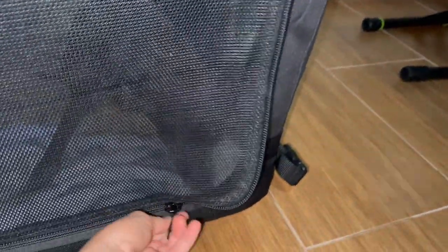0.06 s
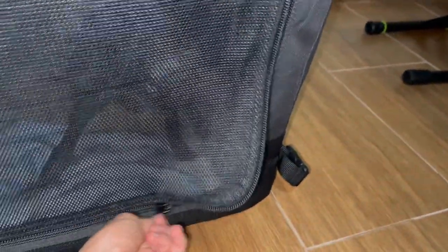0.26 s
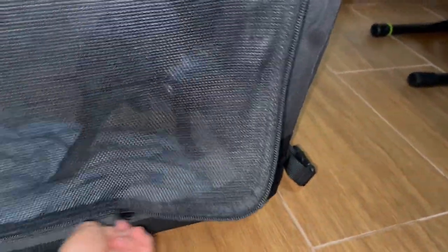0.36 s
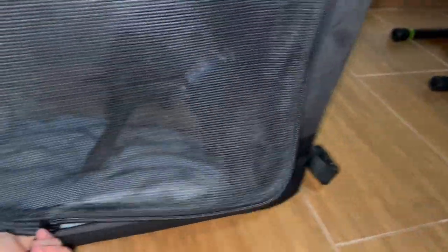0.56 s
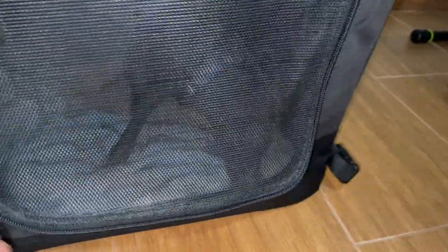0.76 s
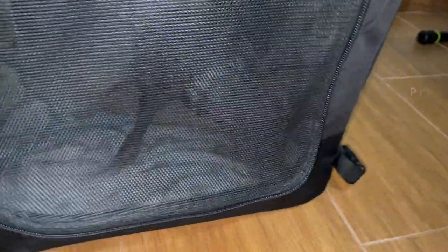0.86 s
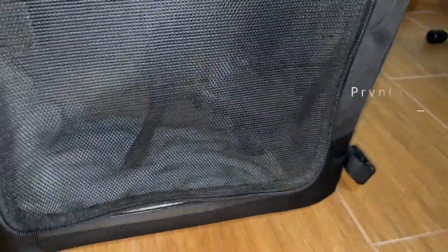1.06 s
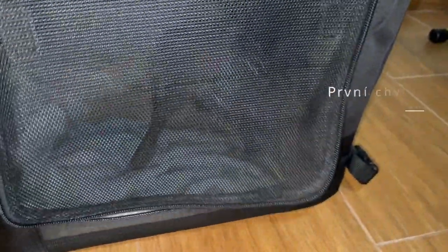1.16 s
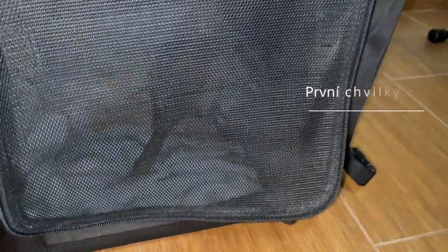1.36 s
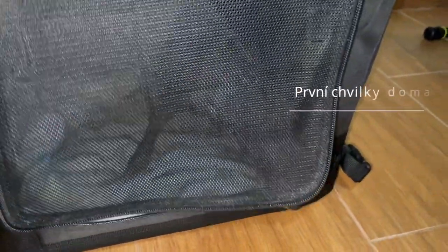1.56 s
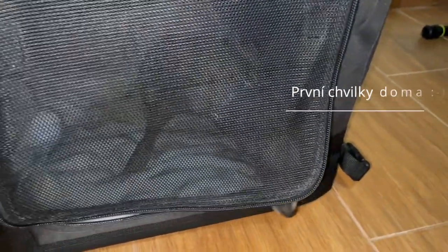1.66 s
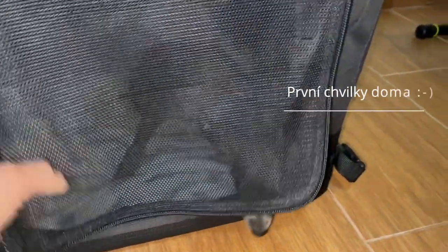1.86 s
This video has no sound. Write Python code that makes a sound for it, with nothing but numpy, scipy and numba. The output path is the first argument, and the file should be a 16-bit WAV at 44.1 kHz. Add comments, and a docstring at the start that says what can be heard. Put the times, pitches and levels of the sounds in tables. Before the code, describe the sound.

A zipper pulled open in two quick strokes, then a light metal clink.

```python
"""The mesh door of a soft pet crate is unzipped, close by, in a small room with a low hum.
First the pull ticks as fingers take hold of it. From 0.23 s to 1.27 s the zip opens in two strokes:
each tooth snaps in the slider and tugs the fabric panel, faster when the hand moves faster,
while the tape (the cloth strip that holds the teeth) scrapes along.
Then the loose door rustles, and at about 1.5 s the metal pull tab clinks."""
import sys
import numpy as np
from scipy import signal
from scipy.fft import rfft, irfft
from scipy.io import wavfile
from scipy.ndimage import uniform_filter1d, map_coordinates
from numba import njit

SR = 44100
rng = np.random.default_rng(int(sys.argv[2]) if len(sys.argv) > 2 else 0)


def put_to_file(sound):
    """Save the sound as 16-bit audio at rate SR, in the file named by the first command-line argument."""
    columns = np.atleast_2d(sound).T  # one column per channel
    safe = np.clip(columns, -1, 1)
    whole_steps = np.round(safe * 32767)
    wavfile.write(sys.argv[1], SR, whole_steps.astype(np.int16))


N = 83790
T = np.arange(N) / SR

# how fast the hand moves the slider: time_s, teeth_per_s
SLIDER_SPEED = [(.2345, 118), (.26, 177), (.29, 203), (.32, 227), (.355, 215), (.40, 229), (.435, 244),
                (.485, 222), (.505, 199), (.57, 199), (.598, 213), (.635, 150), (.675, 76), (.705, 122),
                (.74, 330), (.765, 175), (.785, 145), (.83, 172), (.86, 226), (.905, 282), (.935, 337),
                (.96, 333), (.985, 309), (1.02, 316), (1.054, 302), (1.066, 256), (1.115, 250), (1.14, 241),
                (1.21, 251), (1.24, 208), (1.27, 125)]
# tone colour (strong and weak pitches) of the tape's rasp: pitch_hz, level_db
RASP_COLOUR = [(700, -18.5), (1200, 0.5), (1700, -3.5), (2100, -5), (2500, 0), (3500, 0), (4500, -6.5),
               (6000, -2), (8000, 2.5), (13000, -32.5)]
# level of the room's echo against the direct sound
SNAP_ROOM_DB, RASP_ROOM_DB, PANEL_ROOM_DB = -11, -2, -6.5


def gain(db):
    """Turn decibels into a factor to multiply by."""
    return 10 ** (np.asarray(db) / 20)


def curve(table):
    """Join rows of (time_s, value) with straight lines."""
    return np.interp(T, *np.array(table, float).T)


def by_frequency(table, size):
    """Spread rows of (pitch_hz, value) over the spectrum of `size` samples."""
    hz, value = np.array(table, float).T
    spectrum_hz = np.arange(size // 2 + 1) * SR / size
    return np.interp(np.log(spectrum_hz + 1), np.log(hz), value)


def unit(x):
    """Scale a signal to an average power of 1."""
    return x / np.sqrt(np.mean(x ** 2) + 1e-20)


def noise():
    """An even hiss (white noise)."""
    return rng.standard_normal(N)


def impulses(times, sizes, reach=8):
    """Sharp clicks at exact times, even between two samples."""
    out = np.zeros(N)
    at = np.asarray(times)[:, None] * SR
    index = at.astype(int) + np.arange(1 - reach, reach + 1)
    clicks = np.asarray(sizes)[:, None] * np.sinc(index - at) * np.sinc((index - at) / reach)
    np.add.at(out, np.clip(index, 0, N - 1), clicks)
    return out


def tint(x, colour, size=4096):
    """Give a sound a tone colour; white noise keeps its power."""
    cepstrum = irfft(by_frequency(colour, size) * np.log(10) / 20)
    # make the filter ring after a click, never before it
    cepstrum[1:size // 2] *= 2
    cepstrum[size // 2 + 1:] = 0
    response = irfft(np.exp(rfft(cepstrum)))
    return signal.fftconvolve(x, response / np.linalg.norm(response))[:N]


@njit
def resonate(x, pitch_hz, width_hz):
    """Let through a band of sound around a pitch that may move."""
    out, band_state, low_state = np.empty(len(x)), 0., 0.
    for i in range(len(x)):
        step, damping = np.tan(np.pi * pitch_hz[i] / SR), width_hz / pitch_hz[i]
        band = (band_state + step * (x[i] + 1e-18 - low_state)) / (1 + step * (step + damping))
        band_state = 2 * band - band_state
        low_state += 2 * step * band
        out[i] = damping * band
    return out


def place(x, room_db, fade_60db_s=0.15, gap_s=0.00281):
    """Sound reaches the left and right microphone directly, then as a short room echo."""
    # how much louder the left side is: pitch_hz, level_db
    balance = [(60, .3), (200, 1), (380, 2.5), (700, 6.5), (1300, 5), (2400, 2.5), (5500, 4), (8100, .5),
               (15000, 0)]
    # how far the left side's wave is ahead: pitch_hz, phase_radians
    left_lead = [(60, 0), (450, .65), (800, .7), (1100, 1.9), (1500, 1.5), (2300, 0), (3200, .6),
                 (5000, .6), (7000, .1), (8650, 0), (10200, -3.14), (11900, -6.28), (13300, -8)]
    size, t = 2 * N, T[:N // 2]
    tail = rng.standard_normal((2, len(t))) * gain(-60 * t / fade_60db_s) * (t > gap_s)
    tail /= np.linalg.norm(tail, axis=1, keepdims=True)
    tilt = gain(by_frequency(balance, size) / 2)
    sides = np.array([tilt * np.exp(1j * by_frequency(left_lead, size)), 1 / tilt])
    room = rfft(tail, size)
    alike = by_frequency([(60, 1.0), (600, 0.26)], size)  # both sides share the deepest echo
    room[1] = alike * room[0] + np.sqrt(np.clip(1 - alike ** 2, 0, 1)) * room[1]
    return irfft(rfft(x, size) * sides * (1 + gain(room_db) * room))[:, :N]


def room_tone(rumble_db=-54.5, hum_hz=49, hum_db=-55.5):
    """The room rumbles and hums, low and steady."""
    # colour of the rumble: pitch_hz, level_db
    rumble_colour = [(22, -68), (36, -32), (48, -4.5), (60, -3), (80, -4.5), (105, -17), (145, -3.5),
                     (200, -17.5), (400, -21.5), (1000, -31), (4000, -48.5), (11000, -53), (13500, -72)]
    rumble = gain(rumble_db) * tint(noise(), rumble_colour)
    hum = gain(hum_db) * np.sin(2 * np.pi * hum_hz * T)
    return place(rumble, room_db=-12.5) + hum


def door_fabric(grain_db=1.5):
    """The door rustles and flaps softly; most flaps fall in pitch as the cloth slackens."""
    # loudness of the rustle: time_s, level_db
    rustle_level = [(0, -58.5), (.16, -69.5), (.19, -60), (.24, -42), (1.27, -46), (1.33, -57), (1.42, -64),
                    (1.49, -77), (1.512, -47), (1.55, -58.5), (1.6, -44.5), (1.64, -50.5), (1.68, -59),
                    (1.73, -72.5), (1.785, -64), (1.9, -65)]
    # colour of the rustle: pitch_hz, level_db
    rustle_colour = [(60, -4.5), (160, 9), (300, 16), (500, 12), (1000, 8), (2800, 4), (4000, 2.5),
                     (8500, 1.5), (11400, 8.5), (13000, -20), (16000, -61)]
    # soft flaps: time_s, pitch_hz, level_db, width_s, pitch_fall_per_s
    flap_events = [(.622, 560, -30, .006, 9), (.744, 320, -22.5, .008, 14), (1.263, 350, -32, .005, 12),
                   (1.278, 175, -29, .006, 12), (1.338, 178, -47, .022, 0), (1.635, 305, -44, .015, 6),
                   (.04, 145, -52, .03, 0)]
    flicker = unit(uniform_filter1d(noise(), size=90))
    grain = unit(gain(grain_db * flicker))
    rustle = tint(grain * noise(), rustle_colour) * gain(curve(rustle_level))
    flaps = 0
    for at, hz, db, width_s, fall in flap_events:
        pitch = hz * np.exp(-fall * np.clip(T - at, -2 * width_s, 2 * width_s))
        swell = np.exp(-.5 * ((T - at) / width_s) ** 2)
        flaps += gain(db) * swell * np.sin(2 * np.pi * (np.cumsum(pitch) / SR + rng.random()))
    return place(rustle, PANEL_ROOM_DB) + place(flaps, room_db=-13)


def finger_ticks(span_s=0.0023):
    """The pull and slider tick as the fingers take hold and let go."""
    # ticks, with levels averaged over span_s: start_s, low_db, middle_db, treble_db, decay_s
    ticks = [(0.059, -78, -73, -36.5, 0.00046), (0.115, -55, -50, -44.5, 0.0013),
             (0.1796, -49, -49.5, -49, .0006), (0.2028, -32, -38, -29, .0011),
             (.208, -44, -43, -42, 0.00072), (.2205, -35.5, -33.5, -33.5, 0.00057),
             (1.442, -53, -49.5, -62.5, 0.00037), (1.512, -55, -43.5, -40, 0.003),
             (1.534, -58, -69, -49, .002), (1.5609, -43.5, -39, -32, 0.0018),
             (1.746, -53, -51, -56, 0.00088)]
    # colour of the panel's knock under a tick: pitch_hz, level_db
    knock_colour = [(100, -4), (250, -3), (450, -3), (700, -2), (1000, 5.5), (1400, -8.5), (4000, -57)]
    # colour of a tick's treble: pitch_hz, level_db
    treble_colour = [(3000, -27), (5500, -7), (7000, -14.5), (8800, 2), (10200, 6), (11400, 8),
                     (12500, -12), (14000, -11), (16000, -23)]
    bands = (knock_colour, PANEL_ROOM_DB), (RASP_COLOUR, RASP_ROOM_DB), (treble_colour, SNAP_ROOM_DB)
    out = 0
    for band, (colour, room_db) in enumerate(bands):
        layer = np.zeros(N)
        for at, *levels_db, decay_s in ticks:
            grit = noise() * np.exp(-np.abs(T - at) / decay_s) * (T >= at)
            layer += gain(levels_db[band]) * unit(tint(grit, colour)) * np.sqrt(span_s * SR / N)
        out += place(layer, room_db)
    return out


def fading_tone(pitch_hz, fade_60db_s):
    """One tone of a struck object, dying away."""
    return np.sin(2 * np.pi * pitch_hz * T) * gain(-60 * T / fade_60db_s)


def pull_tab():
    """The metal tab swings against the slider and rings; its plastic pull clicks."""
    # tones of the metal tab: pitch_hz, level_db, fade_60db_s
    tab_tones = [(2150, -7, .03), (2500, -7, .035), (4283, 0, .065), (4325, -4, .05), (4452, -5, .04),
                 (8200, 1, .022), (10340, -1, .045)]
    # hits on the slider: start_s, level_db
    clinks = [(1.508, -50), (1.515, -39), (1.559, -53)]
    # hollow plastic clicks: start_s, pitch_hz, level_db
    plastic_clicks = [(.114, 1780, -43.5), (0.181, 2850, -41.5), (1.441, 2350, -36)]
    times, hit_db = np.array(clinks).T
    ringing = sum(gain(db) * fading_tone(hz, fade_s) for hz, db, fade_s in tab_tones)
    out = signal.fftconvolve(impulses(times, gain(hit_db)), ringing)[:N]
    for at, hz, db in plastic_clicks:
        click = fading_tone(hz, fade_60db_s=0.0098)
        out += signal.fftconvolve(impulses([at], [gain(db)]), click)[:N]
    return place(out, SNAP_ROOM_DB)


def mesh_panel(tugs):
    """The tugged panel buzzes in three bands that change as the slider moves along it."""
    # loudness of each band: time_s, level_db
    low_level = [(.23, -45), (.314, -39.5), (.47, -53), (.53, -44), (.62, -37), (.68, -42.5), (.744, -36.5),
                 (.786, -44), (.896, -43.5), (0.931, -35), (1.02, -39.5), (1.05, -46), (1.078, -44.5),
                 (1.27, -47)]
    middle_level = [(.23, -40), (.29, -34), (.34, -33), (.375, -37), (0.396, -26.5), (.46, -37.5),
                    (.53, -33.5), (.595, -34.5), (.62, -33), (.67, -32.5), (0.724, -29.5), (.76, -40),
                    (.82, -36), (.89, -39), (.95, -37.5), (1, -56.5), (1.046, -36), (1.07, -42.5),
                    (1.196, -35), (1.24, -44.5), (1.269, -30.5)]
    high_level = [(.23, -48), (.3, -34.5), (.36, -42), (.4, -33.5), (.5, -37.5), (.55, -44.5), (.63, -35),
                  (.68, -46), (.8, -37), (.912, -31), (.945, -45.5), (0.987, -25), (1.043, -25.5),
                  (1.075, -35.5), (1.15, -33), (1.2, -39.5), (1.27, -35)]
    # colour of each band: pitch_hz, level_db
    low_colour = [(50, -37), (130, -13.5), (205, -7.5), (330, -6.5), (400, -10), (600, -46)]
    middle_colour = [(220, -28.5), (340, -14.5), (450, 4), (620, 1.5), (720, 0.5), (1000, -27)]
    high_colour = [(500, -40), (660, -15.5), (740, 0.5), (930, 1), (1150, 3.5), (1400, -13.5),
                   (2600, -26.5)]
    # where the upper two bands ring: time_s, pitch_hz
    middle_pitch = [(.23, 390), (.28, 547), (.325, 640), (.355, 450), (.46, 447), (.52, 600), (.615, 590),
                    (.65, 403), (.72, 530), (.76, 420), (.81, 475), (.86, 566), (.95, 690), (1.05, 593),
                    (1.085, 523), (1.22, 520), (1.265, 384)]
    high_pitch = [(.23, 840), (.3, 795), (.34, 1039), (.41, 970), (.46, 1020), (.58, 990), (.66, 880),
                  (.9, 876), (.97, 890), (1.05, 944), (1.075, 770), (1.17, 690), (1.25, 1060)]
    middle = resonate(tugs, curve(middle_pitch), width_hz=131.) + gain(-30) * tugs
    high = resonate(tugs, curve(high_pitch), width_hz=130.) + gain(-15) * tugs
    buzz = tint(tugs, low_colour) * gain(curve(low_level))
    buzz += tint(middle, middle_colour) * gain(curve(middle_level))
    buzz += tint(high, high_colour) * gain(curve(high_level))
    return place(buzz, PANEL_ROOM_DB)


def tape_rasp(force, swell_s=0.056):
    """The tape rasps, with ringing bands that swell and fade as the slider passes."""
    # ringing bands of the tape: time_s, pitch_hz, relative_level_db
    bands = [(.315, 2560, -5), (.33, 3500, 0), (.42, 1890, -5), (.56, 3380, -4.5), (.77, 1680, -1),
             (1.161, 2340, -2.5), (1.25, 5370, 0.5)]
    # loudness of the rasp: time_s, level_db
    rasp_level = [(.23, -50), (.234, -43), (.316, -37), (.456, -39), (.602, -37.5), (.68, -46), (.708, -42),
                  (.74, -34.5), (.788, -38), (.932, -30.5), (1.2, -37), (1.242, -34), (1.27, -37.5),
                  (1.275, -50)]
    rasp = tint(force, RASP_COLOUR)
    for at, hz, db in bands:
        swell = np.exp(-.5 * ((T - at) / swell_s) ** 2)
        ringing = unit(resonate(force, np.full(N, float(hz)), width_hz=0.12 * hz))
        rasp += ringing * gain(db) * swell / 2
    return place(rasp * gain(curve(rasp_level)), RASP_ROOM_DB)


def slider_snaps(force, upper_ratio=1.15):
    """Teeth snap brightly in the slider, which squeals briefly as the second stroke speeds up."""
    # colour of the snaps: pitch_hz, level_db
    snap_colour = [(3000, -21), (5500, -10), (7000, -13.5), (8800, 4), (10200, -3.5), (11300, 6),
                   (12200, -3.5), (13100, -8), (14000, -32), (14500, -18.5), (15600, -22), (16200, -58.5)]
    # loudness of the snaps: time_s, level_db
    snap_level = [(.23, -44.5), (.278, -27.5), (.41, -39.5), (.526, -33.5), (.698, -35.5), (.742, -24.5),
                  (.788, -36), (.892, -28.5), (.922, -26), (.942, -23.5), (1.002, -29.5), (1.044, -21.5),
                  (1.06, -25.5), (1.114, -24.5), (1.174, -27), (1.18, -22), (1.25, -23), (1.268, -27),
                  (1.275, -40)]
    # thin, falling squeal: time_s, pitch_hz, level_db
    squeal_path = [(.81, 9700, -35.5), (.855, 8000, -37.5), (.89, 6670, -32), (.95, 5700, -77)]
    times, hz, db = np.array(squeal_path).T
    pitch = np.interp(T, times, hz)
    two_bands = sum(resonate(force, ratio * pitch, width_hz=550.) for ratio in (1, upper_ratio))
    squeal = unit(two_bands) * gain(np.interp(T, times, db))
    snaps = tint(force, snap_colour) * gain(curve(snap_level))
    return place(snaps + squeal, SNAP_ROOM_DB)


def floor_bounce(x, delay_s=.0005, growth_s=.0009, echo_db=-12):
    """The floor adds a close echo that comes later as the slider travels away."""
    travel = np.cumsum(curve(SLIDER_SPEED))
    lag_s = delay_s + growth_s * travel / travel[-1]
    echo = map_coordinates(x, [(T - lag_s) * SR])
    return (x + gain(echo_db) * echo) / np.hypot(1, gain(echo_db))


def tooth_force(times, sizes, decay_s, grit_db, scrape_db, rise_s=.0002):
    """Each tooth gives a sharp click and a burst of grit; the tape scrapes in between."""
    bursts = np.zeros(N)
    for start_s, size in zip(times, sizes):
        i = int(start_s * SR)
        age = T[:min(N // 100, N - i)]
        bursts[i:i + len(age)] += size * np.exp(-age / decay_s) * (1 - np.exp(-age / rise_s))
    sliding = (T > times[0]) & (T < times[-1])
    clicks = unit(impulses(times + rise_s, sizes))
    grit = gain(grit_db) * (unit(bursts) + gain(scrape_db) * sliding) * noise()
    return unit(clicks + grit) * np.sqrt(sliding.mean())


def zipper(tooth_scatter_db=.8, tug_scatter_db=2.1, rub_db=-9, turn_s=.75, turn_spread_s=.09):
    """Teeth pass the slider one by one: each snaps, rasps in the tape and tugs the panel."""
    rate = curve(SLIDER_SPEED)
    moving = (T >= SLIDER_SPEED[0][0]) & (T <= SLIDER_SPEED[-1][0])
    teeth_passed = np.cumsum(rate * moving) / SR
    times = T[np.searchsorted(teeth_passed, np.arange(int(teeth_passed[-1]) + 1) + 1e-9)]
    time_luck, snap_luck, rasp_luck, tug_luck = rng.standard_normal((len(times), 4)).T
    # the teeth catch unevenly while the hand turns round
    jitter_s = .00005 + .0004 * np.exp(-((times - turn_s) / turn_spread_s) ** 2)
    times = times + jitter_s * time_luck
    sizes = 1 / np.sqrt(np.interp(times, T, rate))  # so speed alone does not add loudness
    snap_sizes = sizes * gain(tooth_scatter_db * snap_luck)
    rasp_sizes = sizes * gain(tooth_scatter_db * rasp_luck)
    bite = tooth_force(times, snap_sizes, decay_s=.00055, grit_db=1.5, scrape_db=-4)
    drag = tooth_force(times, rasp_sizes, decay_s=.0013, grit_db=8, scrape_db=-7)
    tugs = impulses(times, sizes * np.sqrt(SR) * gain(tug_scatter_db * tug_luck))
    rub = gain(rub_db) * noise() * (T > times[0]) * (T < times[-1])
    return slider_snaps(floor_bounce(bite)) + tape_rasp(floor_bounce(drag)) + mesh_panel(tugs + rub)


def scene():
    """Add up all the sounds, in stereo."""
    return zipper() + finger_ticks() + pull_tab() + door_fabric() + room_tone()


def record(dry):
    """Cut away the highest treble."""
    top_hz = 16300
    return signal.sosfilt(signal.ellip(8, .2, 80, top_hz, fs=SR, output="sos"), dry)


dry = scene()
out = record(dry)
put_to_file(out)
```